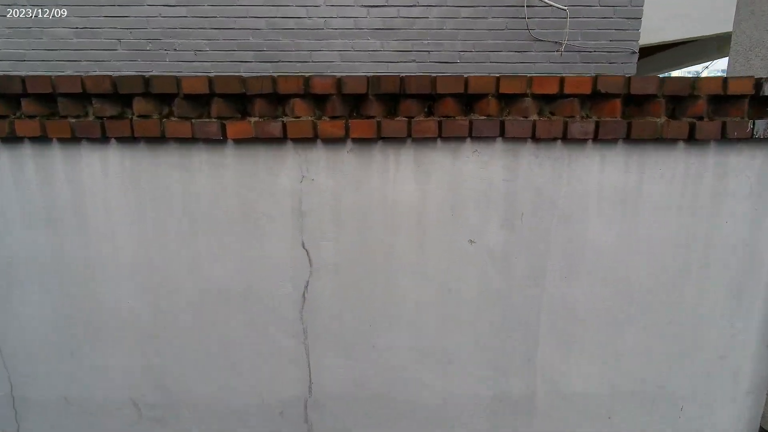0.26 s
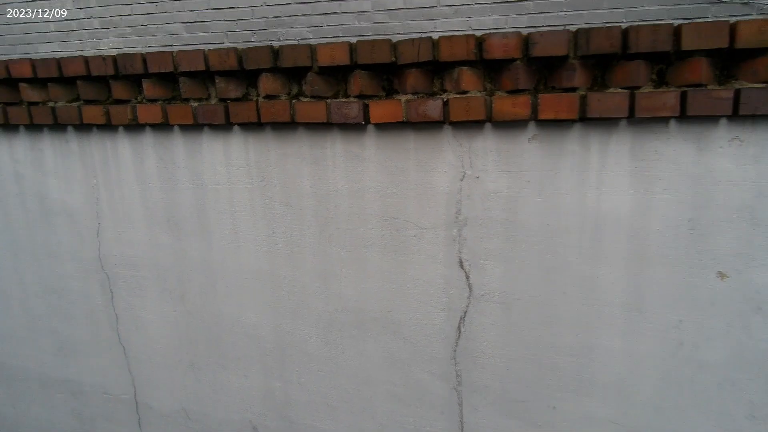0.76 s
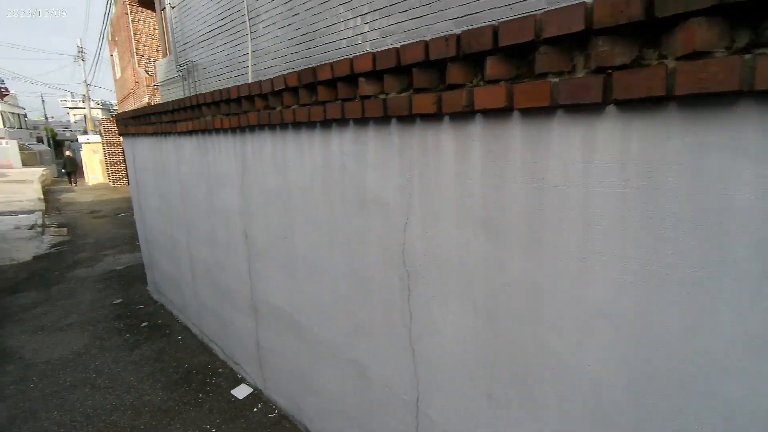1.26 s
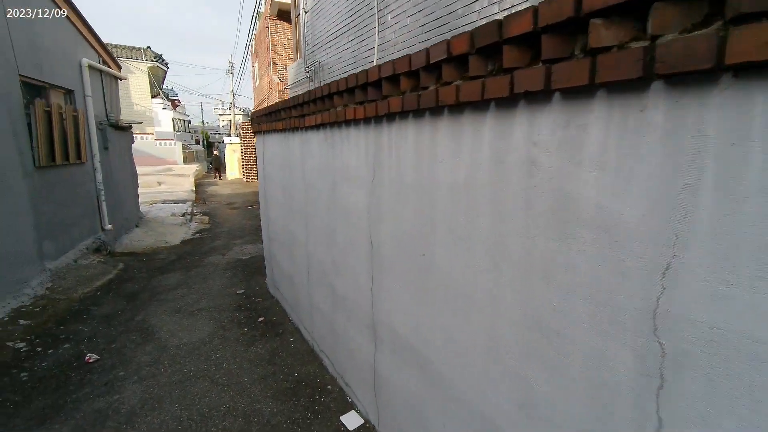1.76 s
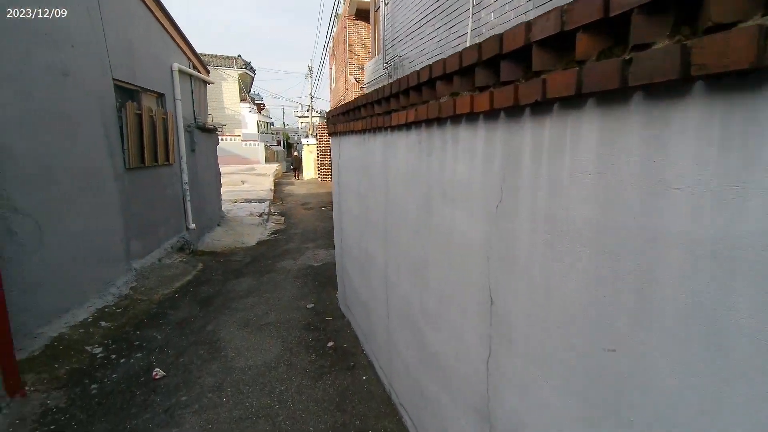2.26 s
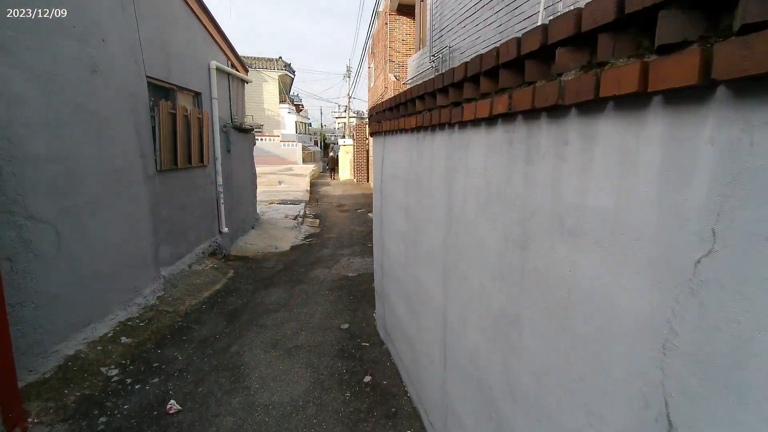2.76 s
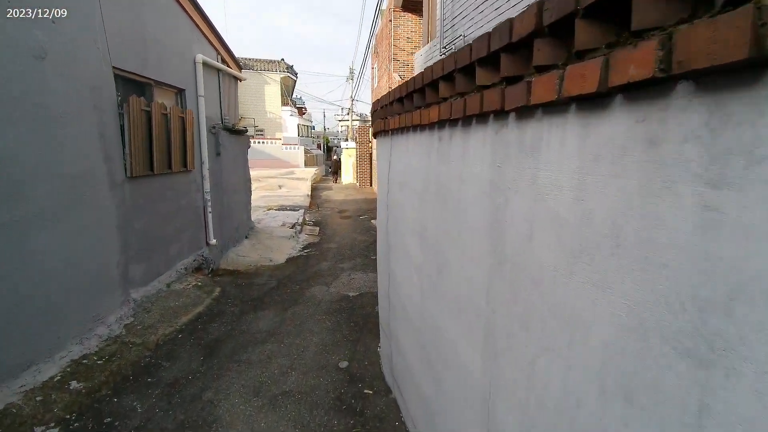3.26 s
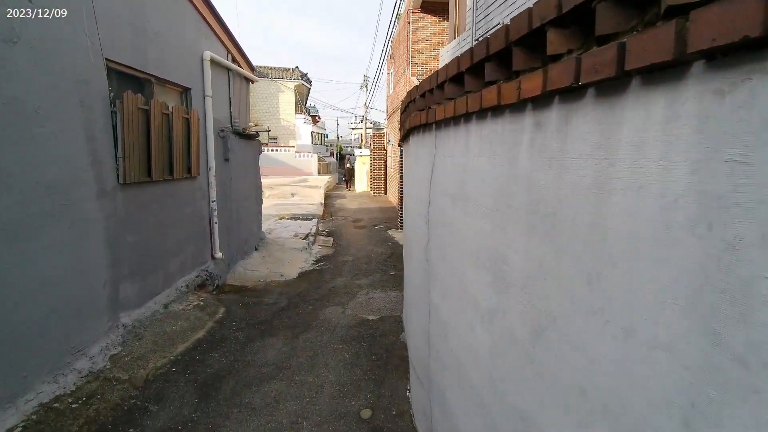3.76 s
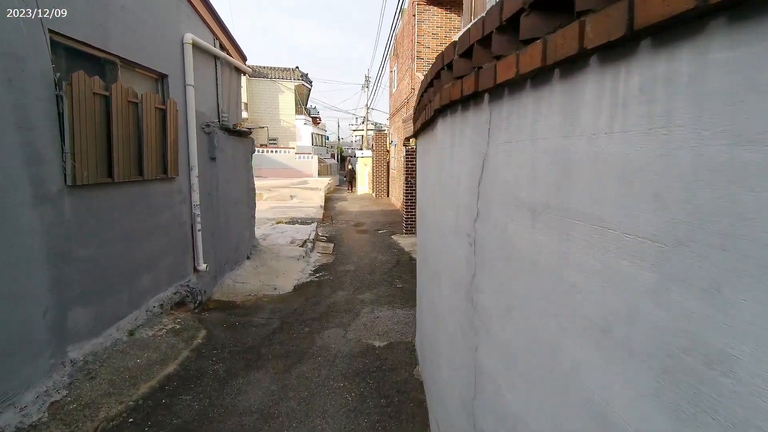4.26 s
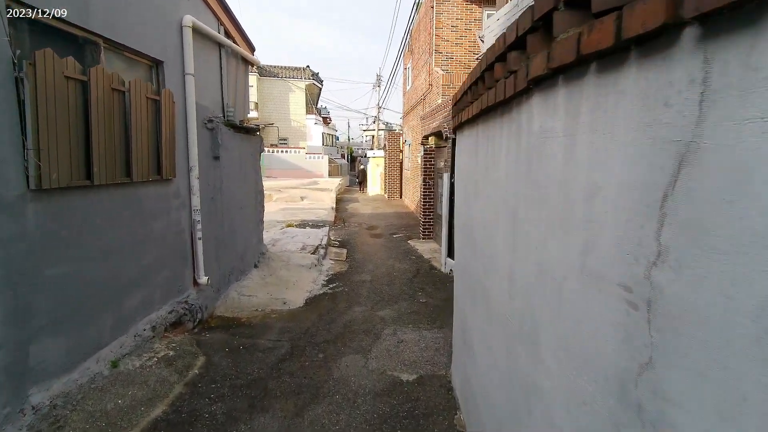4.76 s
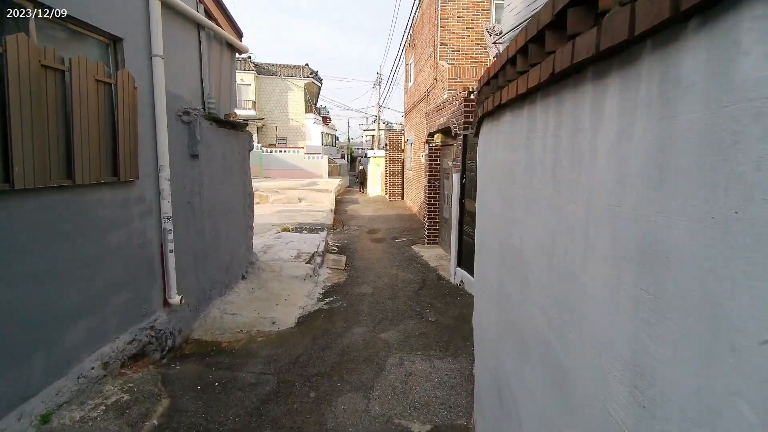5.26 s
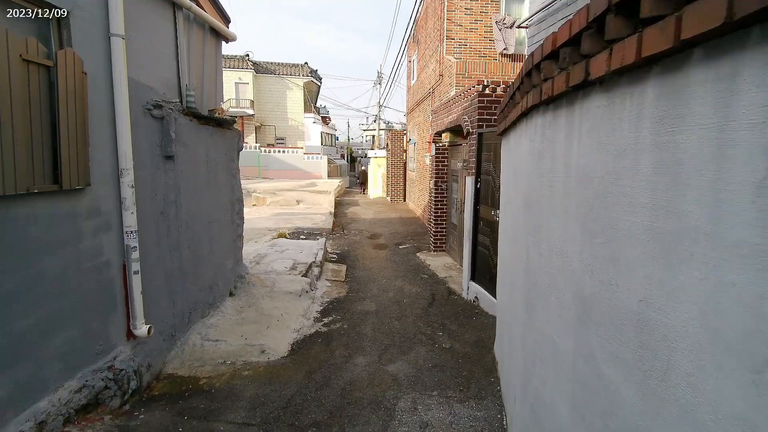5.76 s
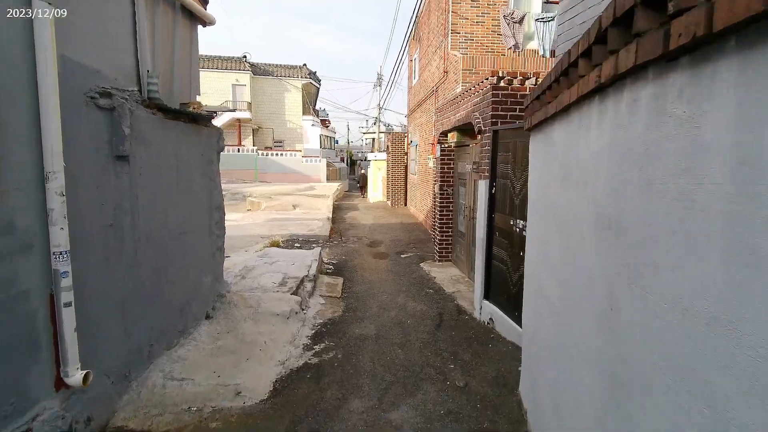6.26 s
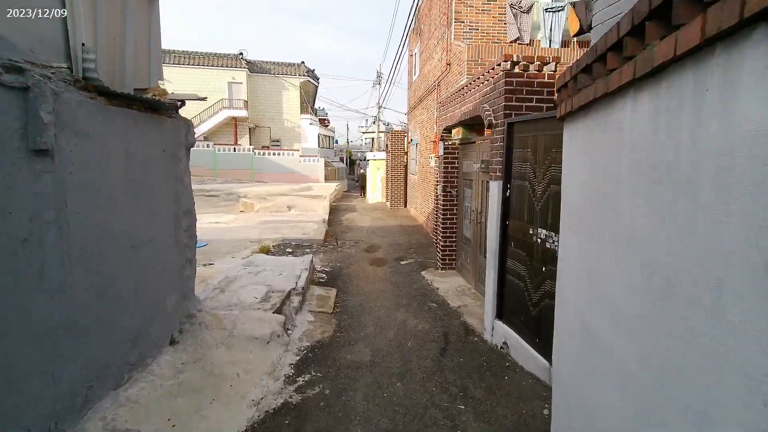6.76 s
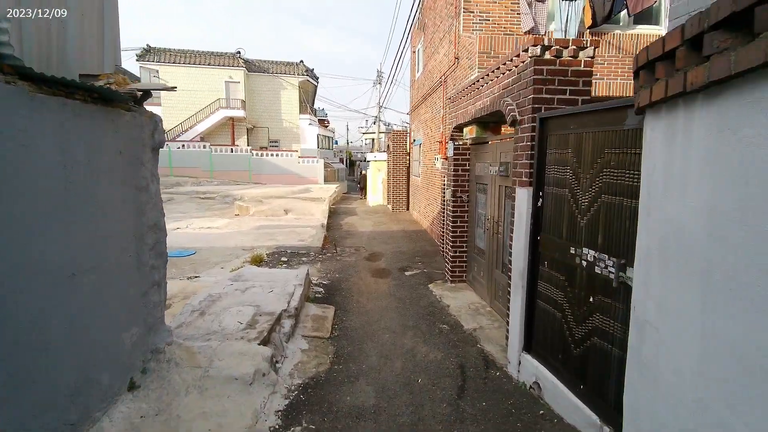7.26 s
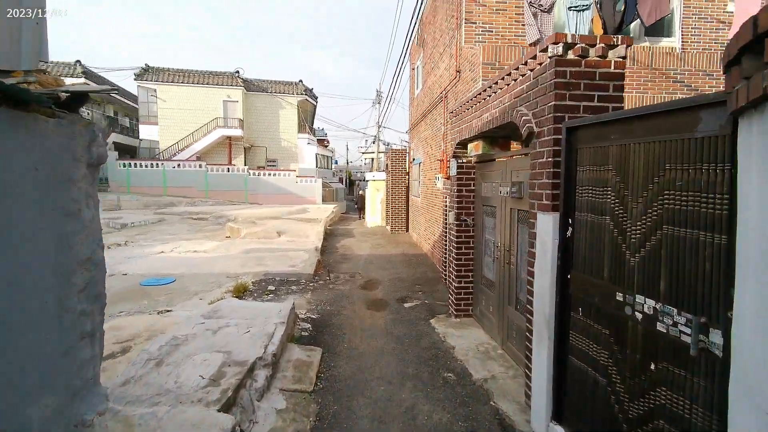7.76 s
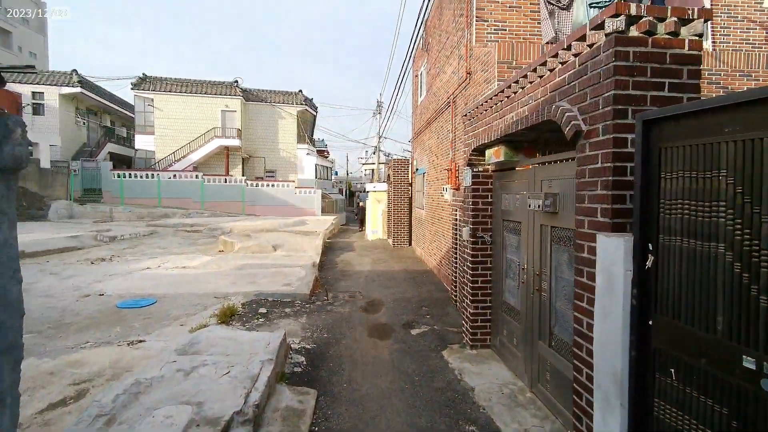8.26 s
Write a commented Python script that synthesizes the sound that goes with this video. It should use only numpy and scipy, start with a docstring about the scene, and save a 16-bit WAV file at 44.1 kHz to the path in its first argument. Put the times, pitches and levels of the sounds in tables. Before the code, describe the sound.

A quiet narrow alley, heard from a handheld microphone near a walker's jacket. From the start, cloth brushes in soft, crisp strokes over a faint neighbourhood wash. Steps begin near 0.6 s and repeat about every 0.6 s: a heel scuff, then a rolling sole, sometimes dragging. Wind thumps the microphone from 0.75 to 1.4 s, a low fluttering rumble, and again at 2.1-2.3 s. After a lull, stronger bursts come at 3.2, 3.6-3.85 and 4.0-4.25 s, the hardest near 4.06 s. Weaker puffs fade by about 5 s. A firm step knocks and cracks grit at 4.8 s. From there to 8.4 s it is calm: gentle scuffs, dull knocks, small gritty ticks near 8.2 s, constant fabric swish, and a barely audible thin whine coming and going. Footsteps have a short, close echo.

```python
"""Someone walks along a narrow concrete alley in soft shoes, camera held close to a rustling jacket.
Several gusts buffet the microphone in the first half: pressure pulses of eddies over a noise rumble.
Then the air calms and leaves the steps, the cloth and a quiet neighbourhood.
Throughout: shoes scrape as filtered grains, knock and crack grit as damped rings, with a short echo;
cloth hisses as coloured noise; thin wavering tones come and go over a faint noise wash.
"""
import sys
import numpy as np
from scipy import signal
from scipy.fft import rfft, irfft, next_fast_len
from scipy.io import wavfile
from scipy.ndimage import uniform_filter1d

SR = 44100
rng = np.random.default_rng(int(sys.argv[2]) if len(sys.argv) > 2 else 0)


def dump(signal):
    """Clip the signal to [-1, 1] and save it as 16-bit WAV at the path in sys.argv[1]."""
    limited = np.clip(np.atleast_2d(signal).T, -1, 1)
    pcm = np.round(limited * 32767).astype(np.int16)
    wavfile.write(sys.argv[1], SR, pcm)


N = 374409
T = np.arange(N) / SR
LEFT_RIGHT = np.array([[1], [-1]])  # opposite sign in the two ears


def undb(db):
    """Decibels to gain."""
    return 10 ** (np.asarray(db) / 20)


def unit(x):
    """Scale to rms 1."""
    return x / np.sqrt(np.mean(x ** 2) + 1e-20)


def noise():
    """White noise, full length."""
    return rng.standard_normal(N)


def add(out, start_s, x):
    """Mix a short sound in at start_s."""
    i = max(int(start_s * SR), 0)
    out[i:i + len(x)] += x[:max(N - i, 0)]


def colour(x, points):
    """Filter by a spectrum of (freq_hz, gain_db) points, straight lines over log frequency."""
    freq_hz, gain_db = np.transpose(points)
    size = next_fast_len(N)
    f = np.fft.rfftfreq(size, 1 / SR) + 1
    gain = undb(np.interp(np.log(f), np.log(freq_hz), gain_db))
    return irfft(rfft(x, size) * gain, size)[..., :N]


def resonance(x, centre_hz, width_hz):
    """Two-pole band-pass, gain 1 at the centre."""
    b, a = signal.iirpeak(centre_hz, centre_hz / width_hz, fs=SR)
    return signal.lfilter(b, a, x)


def walk(rate_hz):
    """Slow smoothed random drift, rms 1."""
    k = int(SR / rate_hz)
    steps = np.repeat(rng.standard_normal(N // k + 2), k)
    return unit(uniform_filter1d(uniform_filter1d(steps, k), k)[:N])


def swells(rows, rise_s, fall_s, rest_db):
    """Level in dB of (start_s, length_s, level_db) swells, summed in power over a resting level."""
    power = np.full(N, undb(rest_db) ** 2)
    for start_s, length_s, level_db in rows:
        i, j = np.searchsorted(T, [start_s - rise_s, start_s + length_s + fall_s])
        age_s = T[i:j] - start_s
        rise = np.clip(.5 + age_s / rise_s, 0, 1)
        fall = np.clip(.5 + (length_s - age_s) / fall_s, 0, 1)
        power[i:j] += (undb(level_db) * rise * fall) ** 2
    return 10 * np.log10(power)


def eddy(freq_hz):
    """A vortex passing the port: push and pull, steep edge between, four periods, peak near 1."""
    edge, edge_ratio = .06, 1.7
    phase = 2 * np.pi * (np.arange(int(4 * SR / freq_hz)) * freq_hz / SR - 2)

    def swing(p):
        return -p * np.exp((1 - p ** 2) / 2)

    return (1 - edge) * swing(phase) + edge * swing(edge_ratio * phase)


def turbulence(level_db, calm_hz=175, gust_hz=240, size_spread=0.56, scatter_db=4):
    """A stream of random eddies; faster air makes them both stronger and shorter."""
    eddies_per_s = 260
    out = np.zeros(N)
    draws = rng.standard_normal((int(eddies_per_s * N / SR), 4))
    for k, (when, size, strength, sign) in enumerate(draws):
        centre_s = np.clip((k + when) / eddies_per_s, 0, T[-1])
        speed = np.clip((level_db[int(centre_s * SR)] + 60) / 22, 0, 1)  # 0 calm, 1 gust
        freq_hz = calm_hz * (gust_hz / calm_hz) ** speed * np.exp(size_spread * np.tanh(size))
        gain = np.sqrt(freq_hz) * np.sign(sign) * undb(scatter_db * min(strength, 1.6))
        add(out, centre_s - 2 / freq_hz, eddy(freq_hz) * gain)
    return unit(out) * undb(level_db)


# single eddies, from strong thumps to faint puffs; trim_db and freq_ratio apply on top:
# centre_s, peak_db, centre_hz
SINGLE_EDDIES = [(0.1432, -42.5, 218), (0.27, -49, 200.0), (0.418, -44, 129), (0.435, -46, 200.0),
                 (0.454, -42.5, 160.0), (0.5382, -39.5, 260.0), (0.564, -47, 160.0), (0.7008, -38, 260.0),
                 (0.747, -32.5, 310.0), (0.7562, -27, 315), (0.774, -31.5, 161), (0.8004, -30, 520.0),
                 (0.8142, -26, 262), (0.8575, -37, 220.0), (0.873, -38, 260.0), (0.8968, -30.0, 366),
                 (0.907, -33, 220.0), (0.9305, -24.0, 420), (0.955, -30, 312), (0.966, -30, 228),
                 (0.978, -31, 310.0), (0.9925, -24.5, 187), (0.9967, -24.5, 375), (1.014, -32, 199),
                 (1.0737, -30, 427), (1.0822, -33, 437), (1.094, -27, 368), (1.1019, -26, 487),
                 (1.111, -38, 480), (1.1475, -46, 160.0), (1.154, -31, 180.0), (1.1602, -35, 220.0),
                 (1.1806, -34, 180.0), (1.2333, -28.5, 224), (1.2406, -34.5, 436), (1.3393, -26, 180.0),
                 (1.3645, -23.5, 375), (1.3766, -24.5, 220.0), (1.3906, -24.0, 440.0), (1.4651, -37, 218),
                 (1.4847, -37, 130.0), (1.4954, -36.5, 180.0), (1.5055, -37.5, 180.0),
                 (1.5682, -39.5, 110.0), (1.66, -38.5, 180.0), (1.758, -38, 130.0), (1.7943, -34, 220.0),
                 (1.854, -38.5, 260.0), (1.8664, -38, 180.0), (1.8934, -42, 180.0), (1.907, -41, 180.0),
                 (1.9531, -36.5, 218), (2.012, -38, 130.0), (2.0942, -32.5, 220.0), (2.1066, -26.5, 380),
                 (2.1217, -31, 373), (2.1305, -33.0, 370.0), (2.1589, -33, 260.0), (2.1651, -24.5, 382),
                 (2.1732, -36, 220.0), (2.1842, -27, 260.0), (2.2041, -25.5, 316), (2.2094, -33, 310.0),
                 (2.241, -25, 436), (2.259, -30.0, 440.0), (2.2684, -22, 420), (2.2717, -29, 480),
                 (2.2744, -21, 262), (2.3054, -30, 220.0), (2.311, -30.5, 397), (2.4657, -43, 110.0),
                 (3.0655, -33.5, 304), (3.1193, -32.5, 220.0), (3.1458, -32, 180.0), (3.2164, -29, 440.0),
                 (3.2231, -19, 445), (3.2298, -24.5, 316), (3.2399, -23, 222), (3.297, -38, 160.0),
                 (3.302, -34.5, 310.0), (3.3108, -34.5, 160.0), (3.3319, -30, 383), (3.3502, -34.5, 130.0),
                 (3.403, -30, 160.0), (3.4325, -27.5, 218), (3.4556, -28.5, 260.0), (3.4632, -32.0, 220.0),
                 (3.4704, -34.0, 440.0), (3.476, -36, 370.0), (3.5082, -36.0, 110.0), (3.5785, -35, 160.0),
                 (3.584, -33, 203), (3.5881, -22.5, 314), (3.596, -24.5, 440.0), (3.6012, -26.5, 610),
                 (3.6341, -32, 370.0), (3.6469, -21.5, 527), (3.667, -22.5, 690), (3.6761, -20.5, 380),
                 (3.7486, -25, 130.0), (3.7539, -19, 490), (3.762, -22, 260.0), (3.7679, -19, 326),
                 (3.7873, -23.5, 322), (3.818, -26, 224), (3.822, -25.5, 550), (3.825, -23.5, 312),
                 (3.857, -33, 485), (3.9044, -34, 109), (3.9097, -30.5, 256), (3.9996, -32.5, 312),
                 (4.0209, -28.5, 310.0), (4.0394, -23.5, 443), (4.0425, -28.5, 796), (4.0456, -26.5, 440.0),
                 (4.0573, -15.5, 500), (4.0652, -20, 220.0), (4.0777, -32, 180.0), (4.0872, -20.5, 313),
                 (4.119, -30, 350.0), (4.1414, -31, 370.0), (4.1539, -32, 443), (4.1722, -29.5, 260.0),
                 (4.181, -33, 310.0), (4.2109, -25, 430), (4.2137, -34, 520), (4.2221, -28, 218),
                 (4.2485, -31.5, 520.0), (4.258, -26.5, 312), (4.3382, -39, 180.0), (4.406, -41, 159),
                 (4.4882, -38, 179), (4.4969, -38, 180.0), (4.5114, -36.5, 218), (4.5411, -37.5, 220.0),
                 (4.6452, -36, 183), (4.713, -46.0, 280.0), (4.7905, -41, 109), (4.7977, -49, 740.0),
                 (4.862, -45, 99), (5.2314, -41.5, 128), (5.274, -43.0, 100.0), (5.286, -47, 120.0),
                 (5.301, -44, 250.0), (5.3255, -46, 160.0), (5.4869, -40.5, 180.0), (5.534, -51, 130.0),
                 (6.4226, -45.5, 131), (6.679, -54, 140.0), (8.355, -49.5, 90.5)]


def single_eddies(trim_db=-1.0, freq_ratio=0.86, swirl_db=-18, swirl_s=.004, swirl_ratio=1.28, count=3):
    """Single eddies, each travelling in a swirl of weaker, mostly quicker ones."""
    out = np.zeros(N)
    for centre_s, peak_db, centre_hz in SINGLE_EDDIES:
        freq_hz = centre_hz * freq_ratio
        add(out, centre_s - 2 / freq_hz, undb(peak_db + trim_db) * eddy(freq_hz))
        for lag, size, strength in rng.standard_normal((count, 3)):
            small_hz = freq_hz * swirl_ratio * np.exp(0.35 * np.tanh(size))
            gain = undb(peak_db + swirl_db) * np.tanh(2 * strength)
            add(out, centre_s + swirl_s * lag - 2 / small_hz, gain * eddy(small_hz))
    return out


def rumble(level_db):
    """Slow pressure swings of the moving air: low-coloured noise."""
    points = [(10, -21.0), (25, -11.5), (45, -4.5), (100, -4.0), (160, -7.0), (300, -15.5), (900, -88)]
    return undb(level_db) * unit(colour(noise(), points))


# gusts and puffs on the microphone, levels before knee and trims:
# start_s, length_s, buffet_db, rumble_db
GUSTS = [(0.119, 0.016, -69, -46), (0.247, 0.11, -77, -56.5), (0.385, 0.45, -58, -51.5),
         (0.75, 0.13, -31, -42), (0.842, 0.36, -35, -45.5), (1.193, 0.24, -46.5, -47),
         (1.323, 0.08, -31, -41.5), (1.398, 0.93, -55.5, -50.5), (1.732, 0.3, -50, -52),
         (2.1, 0.218, -32, -42.5), (2.334, 0.13, -53.5, -51), (2.994, 0.11, -56, -50),
         (3.045, 0.16, -48, -43), (3.209, 0.1, -22, -36), (3.257, 0.053, -34, -45),
         (3.313, 0.065, -55, -50), (3.377, 0.12, -37, -53), (3.515, .05, -55, -57), (3.559, 0.14, -37, -36),
         (3.734, 0.074, -28, -34.5), (3.809, 0.069, -21, -41), (3.862, 0.21, -48, -51),
         (4.018, 0.11, -27, -35.5), (4.089, 0.2, -41, -43.5), (4.294, 0.26, -53, -53),
         (4.592, 0.17, -61, -52), (4.785, 0.093, -63, -52.5), (5.213, 0.046, -79, -57),
         (5.29, 0.059, -55, -56.5), (5.42, 0.14, -69, -57.5), (5.785, 0.14, -79, -64),
         (6.32, 0.15, -70, -57.5), (6.651, 0.045, -71, -60), (7.199, 0.036, -65, -60.5),
         (8.134, 0.063, -77, -70.5), (8.327, 0.038, -79, -60)]


def wind(buffet_trim_db=-1, rumble_trim_db=-2, knee_db=-44, flutter_db=2.5):
    """Buffeting over a rumble, with single eddies on top; in strong gusts these take over."""
    rise_s, fall_s, breeze_db, breeze_rumble_db = 0.038, 0.035, -83.5, -74
    flutter = flutter_db * walk(30)
    buffet_rows = [(start_s, length_s, db) for start_s, length_s, db, _ in GUSTS]
    rumble_rows = [(start_s, length_s, db) for start_s, length_s, _, db in GUSTS]
    flow_db = swells(buffet_rows, rise_s, fall_s, breeze_db) + flutter
    low_db = swells(rumble_rows, rise_s, fall_s, breeze_rumble_db) + flutter
    # the random stream levels off above knee_db
    stream_db = flow_db - 10 * np.log10(1 + undb(flow_db - knee_db) ** 2)
    buffeting = turbulence(stream_db) * undb(buffet_trim_db)
    return buffeting + rumble(low_db + rumble_trim_db) + single_eddies()


def spread(x, side_db=-40):
    """The buffeting is almost, but not quite, the same in both ears."""
    envelope = np.sqrt(np.abs(uniform_filter1d(x ** 2, SR // 40)))
    points = [(30, 6), (200, -2), (600, 29.0), (1000, 22.0), (2000, 11), (6000, -42)]
    side = unit(colour(noise(), points))
    return x + undb(side_db) * envelope * side * LEFT_RIGHT


# strokes of the jacket sliding on itself, levels before trims:
# start_s, length_s, level_db, crisp_top_db (relative to level_db)
STROKES = [(0.16, 0.26, -74.0, -7), (0.406, 0.17, -67.5, -11), (0.588, 0.063, -65.5, -5.5),
           (0.68, 0.17, -61.5, -13.5), (0.901, 0.26, -66.0, -7.5), (1.15, 0.065, -65.5, -8),
           (1.253, 0.036, -59.5, -14), (1.287, 0.09, -63.5, -9), (1.405, 0.19, -64.5, -9),
           (1.606, 0.22, -69.5, -30), (1.854, 0.1, -66, -13), (1.953, 0.124, -64, -10),
           (2.16, 0.126, -66.5, -11), (2.261, 0.17, -64.5, -8), (2.474, 0.1, -60, -7),
           (2.574, 0.25, -66.0, -9.5), (2.844, 0.34, -72, -13), (3.16, 0.11, -63, -11),
           (3.342, 0.266, -65.5, -8), (3.654, 0.124, -64.5, -20), (3.791, 0.18, -64, -11.5),
           (3.998, 0.294, -69, -16), (4.296, 0.1, -65.5, -13), (4.462, 0.27, -65.5, -9.5),
           (4.755, 0.17, -65.5, -16), (4.913, 0.19, -70, -6), (5.13, 0.13, -72.0, -9),
           (5.313, 0.093, -69.5, -13), (5.41, 0.089, -63.5, -8), (5.568, 0.3, -66.5, -8),
           (5.89, 0.16, -62.5, -14), (6.104, 0.15, -65, -8), (6.258, 0.33, -73.5, -9),
           (6.514, 0.13, -63.5, -8.5), (6.733, 0.25, -66.5, -9), (6.916, 0.284, -65.5, -11),
           (7.174, 0.25, -69, -10), (7.435, 0.31, -69, -12), (7.714, 0.089, -63.5, -7),
           (7.853, 0.3, -65.5, -10), (8.177, 0.14, -63, -11.5), (8.322, 0.18, -64.5, -10)]
# cloth hiss spectrum, relative: freq_hz, gain_db
CLOTH_COLOUR = [(500, -15), (1150, -5), (1600, -9), (2100, -3.5), (2550, 1), (3000, -6), (3500, -16.5),
                (3950, -11), (4800, -11.5), (5550, -6.5), (6100, -11), (6800, -10), (7700, -14),
                (8300, -23), (11000, -48)]
# crisp top spectrum, relative: freq_hz, gain_db
CRISP_COLOUR = [(6500, -70), (8500, 0.5), (10500, -0.5), (11400, -5.5), (12100, -49), (14000, -13),
                (15500, -14)]


def jacket(rub_trim_db=4, crisp_trim_db=-2, grain_db=0.5, flutter_db=1.0):
    """Threads slip in a dense hiss with a crisp top; its colour drifts at random in a few bands."""
    rise_s, fall_s, rest_db, crisp_rest_db = 0.065, 0.053, -75.5, -85
    rub_rows = [(start_s, length_s, db) for start_s, length_s, db, _ in STROKES]
    crisp_rows = [(start_s, length_s, db + top_db) for start_s, length_s, db, top_db in STROKES]
    rub_db = swells(rub_rows, rise_s, fall_s, rest_db) + rub_trim_db
    crisp_db = swells(crisp_rows, rise_s, fall_s, crisp_rest_db) + crisp_trim_db
    slips = rng.standard_normal((2, N)) * undb(grain_db * walk(900) + flutter_db * walk(45))
    drift_depth, drift_rate_hz = .22, 22
    drift = slips[0].copy()
    for band_hz in (2100, 2700, 4300, 5600, 7000):
        drift += drift_depth * walk(drift_rate_hz) * resonance(slips[0], band_hz, band_hz / 5)
    rub = unit(colour(drift, CLOTH_COLOUR)) * undb(rub_db)
    crisp = unit(colour(slips[1], CRISP_COLOUR)) * undb(crisp_db)
    return rub + crisp


# footsteps, heel then sole, levels before the sole filter, lengths are decay scales:
# heel_s, heel_db, heel_hz, heel_length_s, sole_lag_s, sole_db, sole_hz, sole_length_s
STEPS = [(0.579, -56.5, 1000, 0.061, 0.072, -52, 2730, 0.1),
         (1.231, -53, 910, 0.15, 0.075, -44.5, 1700, 0.032),
         (1.862, -57.5, 1300, 0.061, 0.091, -55, 2200, 0.11),
         (2.463, -67, 918, 0.12, 0.1, -48, 2700, 0.057),
         (3.073, -56.5, 1000, 0.046, 0.14, -50, 2190, 0.029),
         (3.605, -45, 604, 0.099, 0.075, -45, 2320, 0.034),
         (4.21, -48, 1160, 0.076, 0.019, -59, 1750, 0.021),
         (4.768, -51, 1100, 0.023, 0.036, -42, 1900, 0.021),
         (5.287, -56.5, 610, 0.033, 0.056, -51.5, 950, 0.025),
         (5.893, -52, 880, 0.06, 0.038, -53, 2100, 0.043),
         (6.369, -59, 820, 0.079, 0.09, -56.5, 940, 0.039),
         (7.019, -55.5, 865, 0.03, 0.069, -50.5, 2190, .04),
         (7.566, -61.5, 596, 0.07, 0.04, -55.5, 920, 0.086),
         (8.167, -53, 770, 0.064, 0.056, -48, 1900, 0.039)]
# a shoe dragging between steps: start_s, level_db, centre_hz, length_s
DRAGS = [(.74, -46.5, 2980, 0.14), (3.955, -50, 1000, 0.078), (4.828, -46.5, 2450, 0.044),
         (5.46, -57, 2260, 0.088), (5.99, -48, 2830, 0.071), (7.065, -57.5, 730, 0.046)]


def contacts():
    """Every scrape (start_s, level_db, centre_hz, length_s): heel slides, sole rolls down, shoe drags."""
    heels = [step[:4] for step in STEPS]
    soles = [(heel_s + lag_s, db, hz, length_s) for heel_s, _, _, _, lag_s, db, hz, length_s in STEPS]
    return heels + soles + DRAGS


def scuffs(width_ratio=0.91, attack=0.15):
    """Each contact is a short scrape of tiny grains that bites quickly and dies."""
    out = np.zeros(N)
    grains_per_s, bed = 680, .065
    friction = noise() * (bed + (rng.random(N) < grains_per_s / SR))
    for start_s, level_db, centre_hz, length_s in contacts():
        age = T[:int(3 * length_s * SR)] / length_s  # in contact lengths
        pressure = (1 - np.exp(-age / attack)) * np.exp(-age ** 2)
        scrape = friction[int(start_s * SR):][:len(age)]
        for _ in range(2):
            scrape = resonance(scrape, centre_hz, centre_hz * width_ratio)
        scrape = unit(scrape)
        add(out, start_s, undb(level_db) * scrape * pressure[:len(scrape)] / pressure.max())
    return out


def ping(freq_hz, cycles):
    """A sharp, heavily damped ring that falls by 1 / e in so many cycles, peak 1."""
    turns = T[:SR // 25] * freq_hz
    ring = np.sin(2 * np.pi * turns) * (1 - np.exp(-4 * turns)) * np.exp(-turns / cycles)
    return ring / np.abs(ring).max()


# dull knocks of heel and sole on concrete, before the sole filter: start_s, peak_db, centre_hz
KNOCKS = [(.612, -44, 1300), (4.731, -41, 630), (4.775, -50, 1040), (4.798, -30.5, 690), (5.349, -36, 940),
          (5.359, -41, 1200), (5.906, -59, 517), (5.916, -57, 750), (5.927, -51, 617), (6.482, -47, 780),
          (7.03, -53, 860), (7.088, -54, 620), (7.585, -50, 446), (7.625, -54, 770), (7.655, -53, 684),
          (8.173, -44.5, 400), (8.175, -51, 800), (8.184, -42, 950), (8.195, -59, 603), (8.208, -38, 1160)]


def knocks(cycles=1.7):
    """The shoe knocks on the concrete: damped rings."""
    out = np.zeros(N)
    for start_s, peak_db, centre_hz in KNOCKS:
        add(out, start_s, undb(peak_db) * ping(centre_hz, cycles))
    return out


# grit cracking under the sole, before the sole filter: start_s, peak_db, centre_hz
GRIT = [(1.311, -33, 1850), (1.315, -35, 1590), (1.326, -46, 1990), (3.69, -29, 2400), (3.698, -32.5, 2390),
        (4.237, -41, 2200), (4.247, -44, 1500), (4.8052, -27, 2450), (4.809, -43, 2000),
        (4.812, -27.5, 2160), (4.815, -32, 2230), (4.826, -35, 2200), (4.838, -27.5, 2620),
        (4.849, -42, 2420), (4.866, -37, 2540), (5.925, -40, 2000), (5.938, -46, 2400),
        (6.025, -46.5, 2700), (6.383, -48, 1300), (7.03, -47, 2200), (7.778, -43, 2100), (7.89, -43, 2420),
        (8.24, -34, 2210), (8.245, -35.5, 2080), (8.266, -44, 2500)]


def grit(cycles=1.9):
    """Grit cracks under the sole: damped rings, higher than most knocks."""
    out = np.zeros(N)
    for start_s, peak_db, centre_hz in GRIT:
        add(out, start_s, undb(peak_db) * ping(centre_hz, cycles))
    return out


def footsteps():
    """Scuffs, knocks and grit through soft rubber soles, which give little treble."""
    scuff_points = [(200, 5.5), (2700, -10), (3500, -15.5), (6000, -13.0), (12000, -47)]
    hit_points = [(2800, -6.5), (3600, -32), (8000, -2)]
    return colour(scuffs(), scuff_points) + colour(knocks() + grit(), hit_points)


def alley(x, wet_db=-15):
    """Close walls return a short, dense echo: decaying noise after 6 ms."""
    t60_s = 0.4
    age_s = T[:SR // 2]
    echo = rng.standard_normal(len(age_s)) * undb(-60 * age_s / t60_s) * (age_s > .006)
    return x + undb(wet_db) * signal.fftconvolve(x, echo / np.linalg.norm(echo))[:N]


# thin whine that comes and goes, level before line gains: start_s, length_s, level_db
WHINE = [(.43, 0.23, -74), (.95, 0.26, -74), (2.65, 0.28, -78), (3.68, 0.67, -79), (4.8, 0.32, -74.5),
         (5.24, .14, -76), (5.92, 0.2, -75), (6.39, 0.3, -73.5), (7.06, 0.17, -72), (7.48, 0.18, -76),
         (8.21, 0.087, -72)]
# its lines: centre_hz, gain_db
WHINE_LINES = [(5863, -3.5), (5925, -3), (6850, -4.5)]


def whine(rest_db=-88, fade_s=0.1):
    """Faint, thin high tones, wavering in pitch and flickering in level, that come and go."""
    waver_hz, waver_rate_hz, flicker_db = 14, 90, 4.5
    lines = np.zeros(N)
    for centre_hz, gain_db in WHINE_LINES:
        pitch_hz = centre_hz + waver_hz * walk(waver_rate_hz)
        tone = np.sin(2 * np.pi * np.cumsum(pitch_hz) / SR)
        lines += undb(gain_db) * unit(tone * undb(flicker_db * walk(waver_rate_hz)))
    return lines * undb(swells(WHINE, fade_s, fade_s, rest_db))


# quiet neighbourhood and microphone hiss spectrum, relative: freq_hz, gain_db
AIR_COLOUR = [(25, 9), (100, 0.5), (180, -14.5), (280, -5), (450, -5), (800, -2.5), (1150, -1.5),
              (1600, -10), (2400, -4), (3400, -23.5), (6000, -22), (10500, -29), (12200, -31.5),
              (15000, -34)]


def air(mid_db=-64.5, side_db=-75, swell_db=0.7):
    """A distant, slowly swelling wash in the middle, and a faint hiss that differs between the ears."""
    mid = unit(colour(noise(), AIR_COLOUR)) * undb(mid_db + swell_db * walk(1.85))
    side_points = [(100, -19), (500, -4), (1000, -7.5), (2500, 8.0), (3600, 0.5), (6000, 7.5),
                   (10500, 0.5), (12200, -8), (15000, -3.0)]
    side = unit(colour(noise(), side_points))
    return mid + undb(side_db) * side * LEFT_RIGHT


def scene():
    """Wind on the microphone, cloth beside it, shoes below it, whine and neighbourhood behind."""
    return spread(wind()) + jacket() + alley(footsteps()) + whine() + air()


def record(dry):
    """The camera cuts the top: steep elliptic low-pass."""
    top_hz = 15650
    low_pass = signal.ellip(10, .2, 70, top_hz, fs=SR, output="sos")
    return signal.sosfilt(low_pass, dry)


dry = scene()
out = record(dry)
dump(out)
```